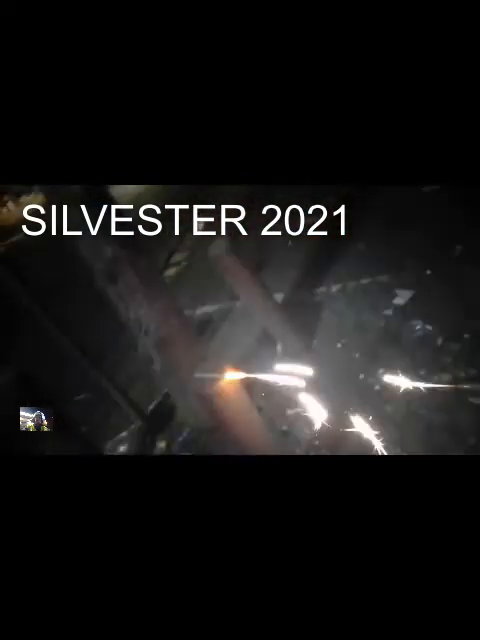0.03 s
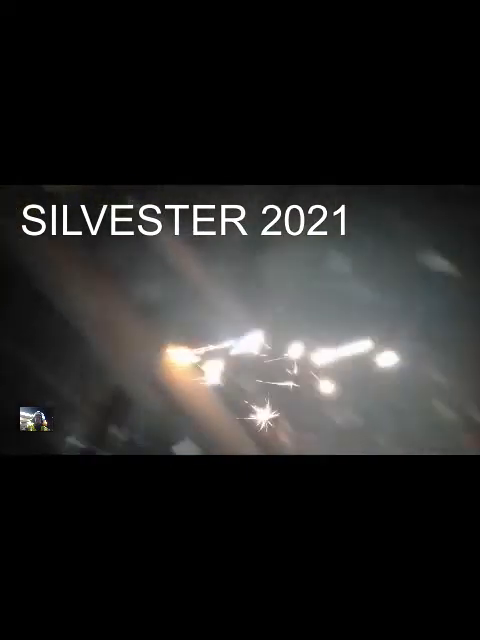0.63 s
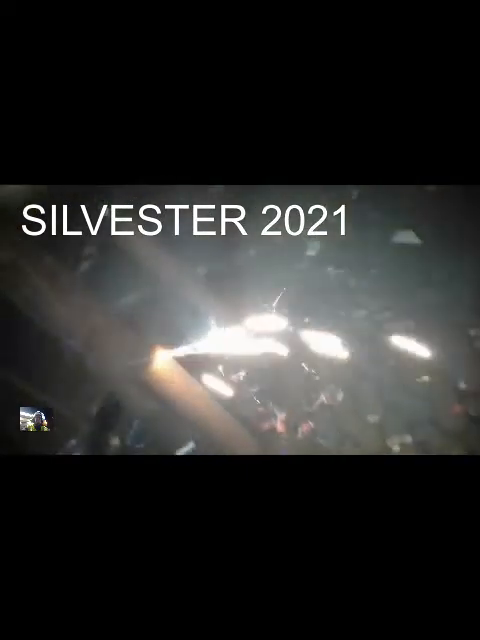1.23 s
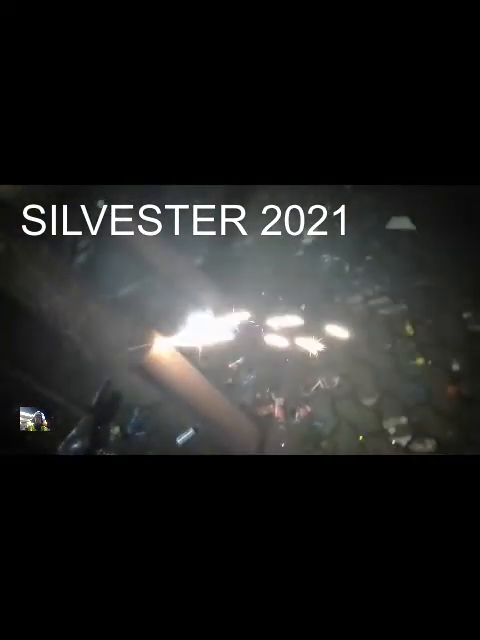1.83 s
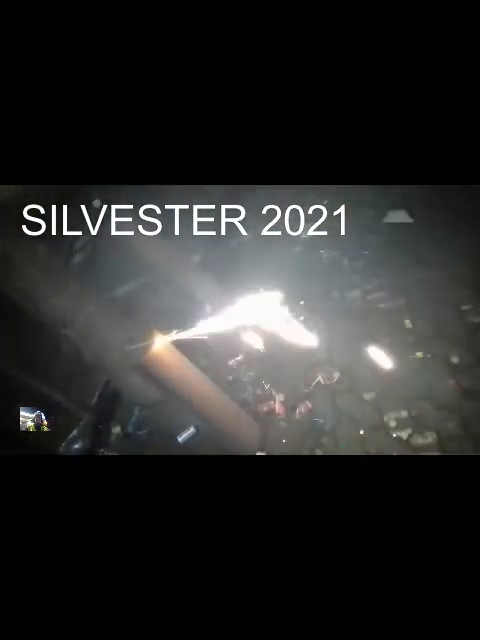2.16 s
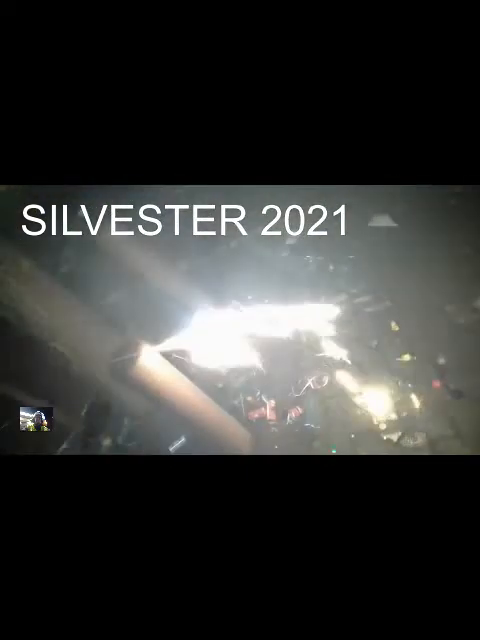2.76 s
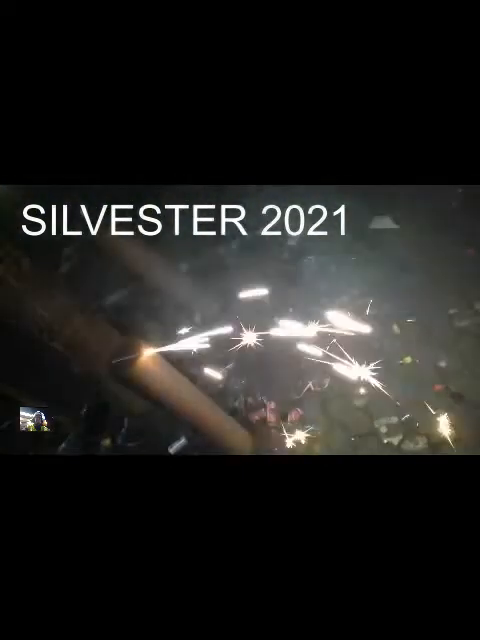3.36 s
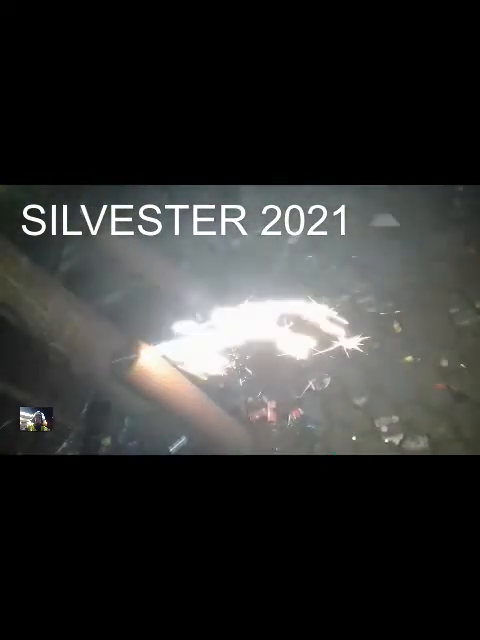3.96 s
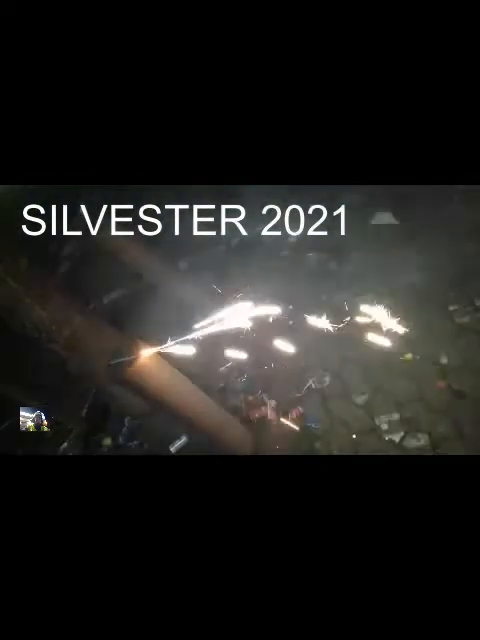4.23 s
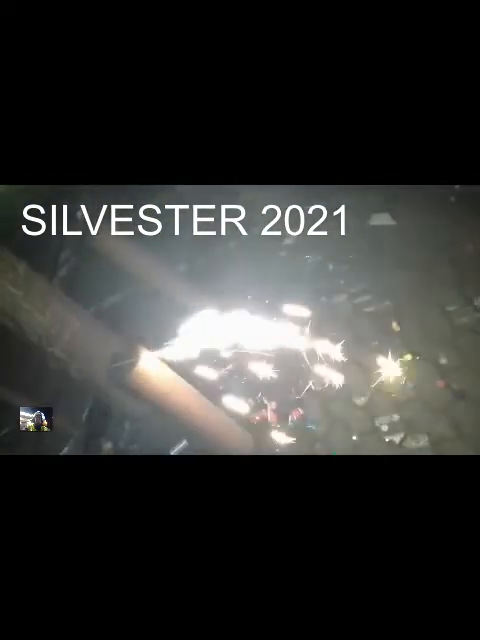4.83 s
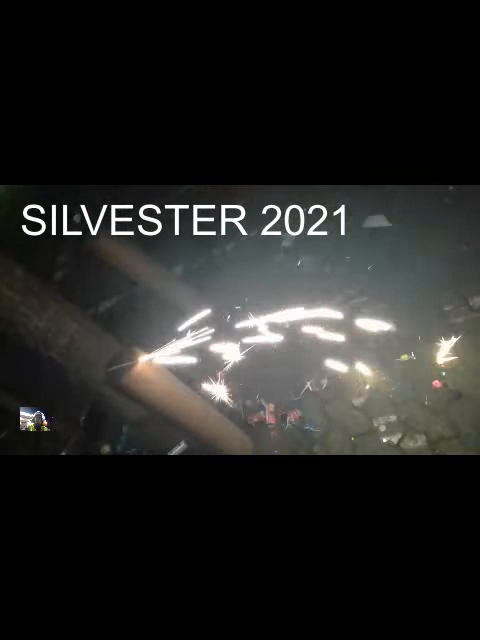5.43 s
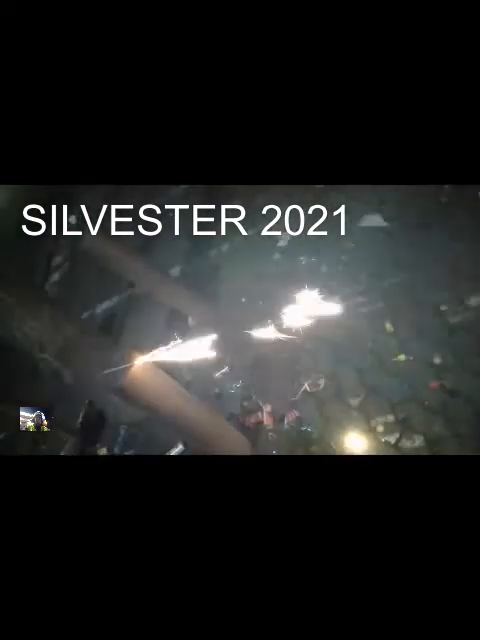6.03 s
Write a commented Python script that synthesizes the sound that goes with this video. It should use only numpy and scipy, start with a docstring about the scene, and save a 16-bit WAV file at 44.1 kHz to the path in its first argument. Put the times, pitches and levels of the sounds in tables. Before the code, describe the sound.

A small firework fountain burns with a high, faintly whistling hiss while sparks tick and snap irregularly. The hiss thins and the crackling eases, then returns in several showers with sharp pops. Near the end the flame gives one short, hollow whoosh, followed by a few last cracks. The microphone is about a metre away in a quiet paved yard with faint wall echoes.

```python
"""A small firework fountain burns on a paved yard at night, about a metre from a phone microphone.
Gas hisses through its nozzle and roars in its fluttering flame. Metal sparks tick and burst in the
air, each echoed by the paving and answered faintly by the house walls. The hiss thins as the nozzle
burns wider, and the charge ends in one hollow whoosh."""
import sys
import numpy as np
from scipy import signal
from scipy.fft import rfft, irfft, next_fast_len
from scipy.io import wavfile
from scipy.ndimage import map_coordinates

SR = 44100
rng = np.random.default_rng(int(sys.argv[2]) if len(sys.argv) > 2 else 0)


def materialize(psi):
    """Save the field psi as 16-bit PCM at rate SR to the path in sys.argv[1].

    A 1-D psi becomes a single channel; in a 2-D psi each row is a channel.
    """
    bounded = np.clip(np.atleast_2d(psi).T, -1, 1)
    quanta = np.round(bounded * 32767).astype(np.int16)
    wavfile.write(sys.argv[1], SR, quanta)


N = 268128
TIME = np.arange(N) / SR

# The slow course of the burn. Each row: time in seconds, then hiss, rush and roar in relative dB.
BURN = [(0.0, -34, -67, -58), (0.45, -36.5, -60, -59.5), (0.54, -33, -68, -54.5), (0.8, -29, -76, -54),
        (1.1, -33, -63, -58.5), (1.29, -37, -62, -59.5), (1.56, -39.5, -62, -45), (1.76, -42, -65.5, -69.5),
        (1.96, -48.5, -63, -64), (2.73, -54, -61, -62), (3.3, -55, -59, -57), (4.15, -54, -60, -54.5),
        (4.55, -60, -59.5, -61.5), (5.28, -69, -58, -58), (5.46, -61, -51, -42), (5.62, -63, -58.5, -47),
        (5.8, -65, -59, -52), (6.08, -54, -62.5, -50.5)]
# The nozzle spits showers of sparks. Each row: peak time and half length in seconds, hiss rise in dB.
SHOWERS = [(2.94, 0.36, 13), (3.93, 0.45, 6.5), (4.93, 0.33, 12.5), (5.42, 0.09, 8)]


def undb(db):
    """Decibels to gain."""
    return 10 ** (np.asarray(db) / 20)


def curves(table):
    """Each column after the first, joined by straight lines in time."""
    times, *columns = np.transpose(table)
    return [np.interp(TIME, times, column) for column in columns]


def swells(table):
    """Bell-shaped swells in dB, summed into one curve for each level column."""
    peak_s, half_length, *columns = np.transpose(table)
    bells = np.exp(-((TIME - peak_s[:, None]) / half_length[:, None]) ** 2)
    return [db @ bells for db in columns]


def gains(spectrum, hz):
    """A spectrum of (Hz, dB) points as gain at the given frequencies."""
    at, db = np.transpose(spectrum)
    return undb(np.interp(np.log(np.maximum(hz, 1)), np.log(at), db))


def coloured(x, spectrum):
    """The sound filtered by a spectrum."""
    size = next_fast_len(N)
    hz = np.arange(size // 2 + 1) * SR / size
    return irfft(rfft(x, size) * gains(spectrum, hz), size)[:N]


def noise(spectrum):
    """Coloured noise of rms 1."""
    x = coloured(rng.standard_normal(next_fast_len(N)), spectrum)
    return x / x.std()


def wander(rate):
    """A random curve with a spread of 1, turning about rate times a second."""
    knots = rng.standard_normal(N // 10)
    curve = np.interp(TIME * rate, np.arange(len(knots)), knots)
    return curve / curve.std()


def tail(x, t60, onset):
    """The sound through a diffuse response of unit energy that builds up and dies away."""
    t = TIME[:SR]
    response = rng.standard_normal(SR) * undb(-60 * t / t60) * (1 - np.exp(-t / onset))
    return signal.fftconvolve(x, response / np.linalg.norm(response))[:N]


def resonances(table):
    """Turbulence in narrow bands; each one swells, glides and fades."""
    out = np.zeros(N)
    for start, end, hz, glide, width, db in table:
        on = (TIME > start) & (TIME < end)
        age = TIME[on] - start
        lowpass = signal.butter(2, width / 2, fs=SR, output="sos")
        slow = signal.sosfilt(lowpass, rng.standard_normal((2, 2 * SR)))[:, :len(age)]
        phase = 2 * np.pi * np.cumsum(hz * (1 + glide * age)) / SR
        band = (slow[0] * np.cos(phase) + slow[1] * np.sin(phase)) / slow.std()
        out[on] += undb(db) * np.sin(np.pi * age / (end - start)) * band
    return out


def nozzle_hiss(grit_db=3.5, whistle_db=2):
    """The nozzle hisses, and whistles breathily as slag builds up and burns off."""
    # Each row: frequency in Hz, level in dB.
    hiss_spectrum = [(6500, -29), (8400, -51), (9600, -12), (11000, -10), (12500, -0.5), (13600, -1),
                     (15000, 1.5), (15650, -10), (16000, -37)]
    # Each row: start and end in seconds, first pitch in Hz, glide as a share of it per second,
    # width in Hz, relative level in dB.
    whistles = [(-0.4, 0.8, 7520, 0.014, 253, -24.5), (-0.4, 0.65, 8840, 0.02, 300, -20),
                (-0.4, 0.8, 10020, 0.0086, 302, -16.5), (-0.4, 0.7, 10800, 0.015, 350, -9),
                (-0.4, 0.7, 12600, 0.018, 446, -8), (-0.3, 0.9, 13420, 0.015, 900, -2.5),
                (0.55, 1.25, 11070, 0.11, 900, -4), (0.6, 1.9, 7500, 0.017, 302, -26),
                (0.7, 1.6, 9380, 0.083, 500, -10), (0.65, 2.0, 12060, 0.015, 650, -0.5),
                (0.75, 1.9, 13400, 0.012, 600, -6), (1.25, 1.95, 8650, 0.049, 300, -13.5),
                (1.2, 1.92, 9690, 0.17, 800, -1.5), (1.1, 1.95, 15100, 0.0056, 453, -10),
                (1.75, 2.65, 10670, 0.1, 1330, -0.5), (4.7, 5.9, 13560, 0.04, 800, 9)]
    grit = undb(grit_db * wander(1800))  # grains of powder pass the nozzle
    return noise(hiss_spectrum) * grit + undb(whistle_db) * resonances(whistles)


def flame_roar():
    """The flame roars, and the hard-blowing tube adds hollow resonances."""
    # Each row: frequency in Hz, level in dB.
    roar_spectrum = [(30, -58), (150, -57), (220, -9), (420, 2), (560, 1.5), (800, -1), (1100, -3),
                     (1400, 2.5), (1900, -2), (2500, 2.5), (3200, -9), (4200, -9), (7000, -22.5)]
    # Each row: start and end in seconds, first pitch in Hz, glide as a share of it per second,
    # width in Hz, level over the roar in dB.
    hollows = [(-0.55, 0.79, 1116, -0.08, 150, -2), (-0.4, 0.79, 1470, 0, 280, -0.5),
               (0.1, 0.46, 2120, 0.028, 151, -7), (-0.1, 0.74, 2420, -0.033, 79, -5),
               (-0.2, 1.1, 2697, 0.016, 90, -6), (1.5, 1.2, 920, 0.1, 290, -7.5),
               (0.36, 1.34, 1280, 0.046, 150, 0.5), (0.67, 1.48, 1720, 0.15, 260, 3),
               (0.6, 1.35, 3000, -0.026, 100, -1.5), (0.7, 1.32, 3300, 0.025, 150, -4.5),
               (0.6, 1.12, 3580, -0.08, 160, -6.5), (0.5, 1.19, 4150, 0.0067, 450, -7),
               (2, 3.5, 4420, 0.016, 200, -11), (3, 3.2, 941, -0.011, 140, -1),
               (5, 6.2, 798, 0.074, 260, -8), (5.5, 5.9, 1450, 0.15, 300, -2),
               (5.5, 5.82, 2420, 0.0054, 260, -2.5), (5.55, 6.24, 4930, 0.034, 280, -10),
               (5.5, 6.1, 5820, -0.055, 250, -8.5)]
    return noise(roar_spectrum) + resonances(hollows)


def off_paving(gas, reflection=.76):
    """The jet reaches the microphone again off the paving, which combs it and makes it hollow."""
    # Each row: time in seconds, lag of the echo in milliseconds.
    echo_lags = [(0, 3.75), (0.35, 3.73), (0.75, 3.655), (1.1, 3.63), (1.7, 3.62), (6.08, 3.62)]
    lag_ms, = curves(echo_lags)
    delayed = map_coordinates(gas, [(TIME - lag_ms / 1000) * SR], order=3)
    echo = signal.sosfiltfilt(signal.butter(1, 14000, fs=SR, output="sos"), delayed)
    return (gas + reflection * echo) / np.hypot(1, reflection)


def through_tube(gas):
    """The tube swallows bands between its resonances; each gap deepens and closes again."""
    # Each row: the gap's two ends in seconds, centre and width in Hz, deepest gain in dB.
    gaps = [(-0.9, 0.42, 1890, 160, -1), (0.5, 0.6, 11200, 300, -7), (0.2, 1.8, 6500, 1100, -6),
            (0.65, 2.04, 2700, 250, -13), (1.05, 2.0, 11200, 320, -11), (4, 5.95, 1030, 120, -12),
            (6, 5.3, 1830, 88, -9), (5.5, 5.74, 3800, 350, -5), (4.5, 6.0, 7900, 1100, -7)]
    hz, t, spectra = signal.stft(gas, SR, nperseg=1024)
    for start, end, centre, width, db in gaps:
        progress = np.clip((t - start) / (end - start), 0, 1)
        depth = np.sqrt(np.abs(np.sin(np.pi * progress)))
        band = np.exp(-((hz - centre) / width) ** 2)
        spectra = spectra * undb(db * np.outer(band, depth))
    return signal.istft(spectra, SR)[1][:N]


def jet(flicker_db=2, sputter_db=1.4, flutter_rest_db=-70.5):
    """Gas hisses, rushes and roars under a fluttering plume; the uneven burn shakes all of it."""
    # The flame flares. Each row: peak time and half length in seconds, roar and flutter change in dB.
    flares = [(0.09, 0.013, 6.5, -3), (0.55, 0.04, 2.5, 13), (0.75, 0.14, 0, 13), (1.328, 0.027, 15, -18),
              (1.554, 0.085, -1, 9), (2.09, 0.025, 10, 2), (3.27, 0.063, 7, 6), (4.79, 0.033, 8.5, 9),
              (4.97, 0.093, 6.5, 5.5), (5.478, 0.034, 4.5, 16), (5.529, 0.015, 7, 27.5),
              (5.588, 0.02, 5, 24.5), (5.672, 0.012, 5, 3), (5.725, 0.053, 6.5, 11)]
    # The bright rush of gas and the plume's low flutter. Each row: frequency in Hz, level in dB.
    rush_spectrum = [(1800, -19), (3200, -2.5), (4400, 0), (5700, 4), (6500, 3.5), (8000, 3.5),
                     (10000, 2.5), (14000, -1.5)]
    flutter_spectrum = [(25, -44), (75, -23.5), (125, -15), (165, -49), (205, -10), (250, 0.5), (320, 6.5),
                        (420, -11.5), (700, -19)]
    hiss_db, rush_db, roar_db = curves(BURN)
    flare_db, flutter_db = swells(flares)
    shower_db, = swells(SHOWERS)
    flame_db = flicker_db * wander(110)
    hiss = nozzle_hiss() * undb(hiss_db + shower_db - 8)
    rush = noise(rush_spectrum) * undb(rush_db + 0.48 * flare_db + 0.19 * shower_db)
    roar = flame_roar() * undb(roar_db + flare_db + flame_db - 4)
    flutter = noise(flutter_spectrum) * undb(flutter_rest_db + flutter_db + flame_db)
    gas = (hiss + rush + roar) * undb(sputter_db * wander(55))
    return through_tube(off_paving(gas)) + flutter  # the whole plume flutters, with no sharp echo


def night_air(level_db=-71.5):
    """The faint, steady air of the yard."""
    # Each row: frequency in Hz, level in dB.
    air_spectrum = [(20, 6), (70, -2), (160, -16), (280, -5), (1000, 7), (4000, 5.5), (15000, -51)]
    return undb(level_db) * noise(air_spectrum)


def sparks(start_s, body_db, body_hz, body_q, crack_db, tilt_db, lag_ms, echo_db,
           splinter_db=-15, splinter_s=0.000795, low_cut_hz=209, tilt_from_hz=6940):
    """Each spark is a short blast and a treble crack; it sheds a splinter and echoes off the paving."""
    def unit_rms(spectra):
        return spectra / np.sqrt(np.mean(np.abs(spectra) ** 2, axis=1, keepdims=True))

    def repeat(db, lag_s):
        return 1 + undb(db) * np.exp(-2j * np.pi * np.outer(lag_s, hz))

    # Each row: frequency in Hz, level in dB.
    crack_spectrum = [(200, -74.5), (3000, -52), (7000, -25.5), (9000, -16), (10500, -11), (12000, -6),
                      (13700, 1.5), (15000, -8), (15700, -1.5), (16500, -19)]
    size, lead = 2048, 128  # samples in a spark, and those ahead of its start
    hz = np.arange(size // 2 + 1) * SR / size + 1
    body, low = 1j * hz / body_hz[:, None], 1j * hz / low_cut_hz
    low_cut = (low ** 2 / (1 + np.sqrt(2) * low + low ** 2)) ** 2
    blast = body / (1 + body / body_q[:, None] + body ** 2) / (1 + body / 4) * low_cut
    octaves = np.log2(np.maximum(hz / tilt_from_hz, 1))
    crack = gains(crack_spectrum, hz) * undb(np.outer(tilt_db, octaves))
    burst = undb(body_db)[:, None] * unit_rms(blast) + undb(crack_db)[:, None] * unit_rms(crack)
    burst *= repeat(splinter_db, splinter_s * (.5 + rng.random(len(start_s))))
    burst *= repeat(echo_db, lag_ms / 1000)
    starts = np.clip(np.round(start_s * SR).astype(int), 0, N)
    out = np.zeros(N + 2 * size)
    for at, wave in zip(starts, np.roll(irfft(burst), lead, axis=1)):
        out[at:at + size] -= wave
    return out[lead:lead + N]


def small_sparks(start_s, crack_db, tilt_db, body_offset_db, scatter_db=12):
    """Small sparks are nearly all treble; their blast and their height above the ground vary."""
    height, strength, pace = rng.random((len(start_s), 3)).T
    body_db = crack_db + body_offset_db + scatter_db * (strength - .5)
    body_hz = 1150 * 2 ** (2 * pace - 1)
    body_q = np.full(len(start_s), 0.44)
    lag_ms = 1.4 + 2.4 * height
    return sparks(start_s, body_db, body_hz, body_q, crack_db, tilt_db, lag_ms, echo_db=-5)


def fizz(count=200, tilt_db=10, warm_up_db=9, warm_up_s=2.5):
    """A spray of tiny sparks, slow to get going, stronger in showers and while the nozzle blows hard."""
    when, size, brightness = rng.random((count, 3)).T
    start_s = when * N / SR
    size_db = -35 + 4 * np.minimum(-np.log(size), 2)
    blow_db = curves(BURN)[0]
    drive_db = 0.31 * (blow_db - blow_db.mean()) + 0.72 * swells(SHOWERS)[0]
    lacking_db = warm_up_db * np.maximum(1 - start_s / warm_up_s, 0)
    crack_db = size_db + np.interp(start_s, TIME, drive_db) - lacking_db
    return small_sparks(start_s, crack_db, tilt_db * (2 * brightness - 1), body_offset_db=-17.5)


def ticks():
    """Small sparks spit one by one and stand out from the spray."""
    # Each row: start in seconds, crack level in dB, brightness in dB per octave.
    spits = [(0.043, -13.5, 9), (0.373, -20, 4), (0.478, -13.5, 0), (0.489, -17, -6), (0.529, -13.5, 12),
             (0.538, -17, 24), (0.595, -17.0, 18), (0.608, -16, 10), (0.627, -18.5, -2), (0.659, -14.0, 6),
             (0.679, -10.5, 4), (0.735, -8, 4), (0.748, -11, 1), (0.77, -11, 1), (0.795, -14, 3),
             (0.828, -13, -1), (0.845, -11, -4), (0.981, -12, -4), (1.015, -11, 1), (1.062, -8.0, 0),
             (1.08, -10.5, 2), (1.095, -22, -4), (1.114, -15, 1), (1.132, -17, 1), (1.18, -17, -4.5),
             (1.205, -13.5, 0.5), (1.234, -16, 2), (1.237, -25, 23), (1.301, -15, -6), (1.309, -10.0, 20),
             (1.334, -12, 12), (1.378, -13, 12), (1.398, -17.0, 23), (1.445, -18.5, 18), (1.689, -16.5, -4),
             (1.713, -19.0, -6), (1.725, -16.0, 0), (1.823, -19, 12), (1.898, -23, 4), (1.946, -20.5, -3),
             (1.966, -23.5, -2), (2.004, -21, -3), (2.032, -21.5, -8), (2.094, -22.5, -12), (2.124, -24, 2),
             (2.174, -19, -9), (2.227, -25, 0), (2.239, -21.5, -6), (2.289, -25, 8), (2.297, -20.5, -7),
             (2.455, -23, 0), (2.463, -25, 4), (2.559, -15.5, 0), (2.567, -23.5, -12), (2.588, -19, -5),
             (2.667, -19.5, -8), (2.684, -24, -7), (2.7, -22.5, 0), (2.741, -22.5, -8), (2.814, -25, -17),
             (2.827, -19, 6), (2.831, -21.5, 8), (2.854, -18, -8), (2.894, -10.5, -5), (2.903, -10, 14),
             (2.916, -12, -4), (2.925, -14, 6), (2.934, -14, 16), (2.945, -15.5, -6), (2.985, -18.0, 16),
             (2.995, -16, 16), (3.011, -22, 0), (3.029, -18.5, 16), (3.057, -22.0, -8), (3.099, -18.5, -10),
             (3.159, -15.5, -5), (3.189, -18.5, -8), (3.194, -21, -6), (3.258, -19, -2), (3.264, -20, -12),
             (3.354, -20, -8), (3.377, -22.0, 6), (3.525, -19, 4), (3.531, -12.5, 4), (3.539, -22, -8),
             (3.557, -20.0, -2), (3.598, -23, -12), (3.604, -15.5, 14), (3.606, -23.5, 18),
             (3.639, -21, -9), (3.706, -16, 0), (3.741, -20, 24), (3.76, -21, 10), (3.773, -22, 4),
             (3.78, -22.5, -12), (3.788, -24, 0), (3.793, -18.5, 2), (3.833, -21, 16), (3.85, -21.5, -6),
             (3.889, -15, -2), (3.931, -19, -6), (3.957, -20, 8), (4.01, -20.5, -6), (4.018, -22.0, 8),
             (4.027, -20, 8), (4.046, -14, 16), (4.072, -22.5, -3), (4.08, -19, 4), (4.083, -24, -3),
             (4.111, -20.5, -10), (4.152, -22, 6), (4.178, -25, -12), (4.192, -17.5, -4), (4.197, -24, -6),
             (4.266, -18.5, 13), (4.275, -21.5, -4), (4.39, -20, -6), (4.423, -21, 16), (4.442, -23.5, -6),
             (4.567, -17.0, 10), (4.58, -21, -6), (4.647, -19, 12), (4.657, -23.0, -2), (4.669, -20, 6),
             (4.69, -21.5, 0), (4.696, -19, 14), (4.704, -16, 3), (4.753, -17, 6), (4.76, -19, 10),
             (4.79, -14, -5), (4.805, -16.0, 6), (4.846, -18, 12), (4.859, -15, 2), (4.871, -23.0, 16),
             (4.879, -21, 20), (4.887, -15.5, 7), (4.9, -18, 18), (4.929, -15.5, 7), (4.93, -16, 4),
             (4.946, -20.0, -3), (4.99, -14, -2), (5.005, -13.0, 16), (5.03, -13.5, 0), (5.043, -15.5, 16),
             (5.065, -12, 20), (5.073, -12, 18), (5.106, -18, 12), (5.142, -22, 10), (5.183, -17, 4),
             (5.208, -21.5, 0), (5.22, -18, 0), (5.249, -20.5, -10), (5.289, -21, 2), (5.317, -22, 20),
             (5.331, -24, -2), (5.362, -20, 0), (5.39, -11, -1), (5.404, -19, -17), (5.431, -15, -6),
             (5.455, -14, 10), (5.467, -12, 12), (5.476, -14, 7), (5.496, -14, 8), (5.51, -20, 14),
             (5.632, -19, -10), (5.802, -19.5, -6), (5.812, -23.0, -8), (5.957, -23, -8),
             (5.972, -16.5, -1), (6.007, -24, 2), (6.048, -20, 14)]
    return small_sparks(*np.transpose(spits), body_offset_db=-24)


def pops():
    """Big sparks burst; a slow, resonant blast knocks like wood, a quick one snaps."""
    # Each row: start in seconds, the body's level in dB, centre in Hz and Q, the crack's level in dB
    # and brightness in dB per octave, lag of the paving echo in milliseconds.
    bursts = [(0.2928, -46, 400, 0.31, -26, -7, 4.1), (0.6354, -19, 850, 0.19, -1.5, 8, 3.2),
              (0.7561, -25.0, 960, 1.6, -7, 1, 2.29), (0.8503, -28.5, 1260, 1.56, -26.0, -1, 3.4),
              (0.9481, -29, 670, 0.56, -10, 0, 3.7), (1.431, -18.5, 1070, 0.24, -2.0, 5, 3.64),
              (1.4904, -17.5, 1030, 0.65, -4, -4, 1.5), (1.5267, -17.5, 1180, 0.67, -6, 4, 2.6),
              (1.5818, -16.5, 960, 0.64, -0.5, -0.5, 2.3), (1.7871, -39, 410, 0.39, -18, 4, 3.2),
              (1.809, -36.5, 740, 1.5, -19, -5, 2.56), (1.8456, -40.0, 1220, 0.91, -23, -3, 4.3),
              (1.915, -42, 400, 0.69, -22, 0, 3.07), (2.1, -32.5, 550, 1.6, -25, -12, 4),
              (2.195, -39.5, 630, 0.25, -16, -8, 3), (2.3526, -32.5, 856, 0.71, -20, -13, 1.18),
              (2.3769, -34, 580, 1.2, -16.5, 0, 3.4), (2.7299, -33.5, 400, 0.28, -18, -3, 2.5),
              (2.796, -23.5, 1060, 0.17, -15.5, -3, 2.8), (2.87, -13, 2900, 0.21, -4, -1, 2.35),
              (2.9982, -31.5, 620, 1.6, -12.5, -2, 3.31), (3.0482, -35, 630, 0.68, -25.5, -10, 3.5),
              (3.0754, -30, 1310, 0.22, -16, -5, 3.1), (3.1112, -29, 830, 0.91, -18, 3, 2.4),
              (3.249, -18.5, 1370, 0.12, -9.0, -3, 2.8), (3.4137, -15.0, 2400, 0.27, -6.5, 2, 2.3),
              (3.479, -16, 1870, 0.12, -8.0, 7, 3.2), (3.5116, -35, 760, 1.04, -28, 3, 1.57),
              (3.6803, -17.0, 2260, 0.33, -8.5, 3, 1.9), (3.8788, -20.5, 2420, 0.31, -11.5, 10, 2.6),
              (3.9405, -29.5, 1630, 0.74, -16, 0, 3.31), (4.1473, -30, 1180, 1.6, -22, 8, 3.61),
              (4.2804, -33.5, 710, 1.06, -19.0, -4, 1.4), (4.3733, -33, 570, 0.23, -15, -4, 0.93),
              (4.4743, -33.5, 630, 0.87, -20, -2, 1.5), (4.5307, -32, 1060, 0.4, -22, 4, 1.57),
              (4.6333, -35.5, 1220, 1.5, -32, 16, 2.27), (4.769, -15.5, 1600, 0.12, -11, 5, 3.6),
              (4.777, -13.5, 1420, 0.2, -8.5, -3, 1.9), (4.7787, -17, 1430, 0.26, -5.5, -6, 2.94),
              (4.9578, -14.0, 2700, 0.53, -2.5, 9, 2.2), (4.9749, -22.5, 940, 0.87, -8, -3, 1.34),
              (5.0827, -14.5, 2390, 0.22, -1.5, 9, 2.65), (5.15, -31.5, 740, 0.52, -19, -9, 1.2),
              (5.187, -30.5, 905, 1.6, -19.0, -15, 1.23), (5.268, -27.5, 510, 0.23, -17.0, -13, 3.3),
              (5.3743, -16.5, 2060, 0.2, -10, 6, 3.34), (5.4366, -15, 1530, 0.37, -8, -1, 1.37),
              (5.5224, -20, 446, 0.25, -10, 6, 3.3), (5.5354, -21, 540, 0.2, -10.5, 5, 2),
              (5.5832, -19.0, 400, 0.38, -30.0, 16, 3.9), (5.6, -21, 660, 2.4, -16, 1, 1.5),
              (5.769, -20.5, 960, 0.2, -14.5, -5, 2.9), (5.862, -13.0, 1940, 0.76, -10.5, 5, 2.23)]
    return sparks(*np.transpose(bursts), echo_db=-5.5)


def sizzle(crackle, level_db=-10):
    """Each spark sizzles out in the top treble just after it has burst."""
    # Each row: frequency in Hz, gain in dB.
    sizzle_band = [(9000, -45), (12500, -5), (13800, 1), (15200, -15)]
    return undb(level_db) * tail(coloured(crackle, sizzle_band), t60=0.049, onset=.001)


def yard_reflections(crackle):
    """Things nearby and the house walls scatter the sparks; rough surfaces return less of the treble."""
    dull = signal.sosfilt(signal.butter(2, 6000, fs=SR, output="sos"), crackle + 1e-18)
    near = tail(undb(-7) * dull + undb(-13) * crackle, t60=.028, onset=.003)
    walls = tail(undb(-14) * dull + undb(-33) * crackle, t60=0.29, onset=0.049)
    return near + walls


def scene():
    """The fountain and its sparks from a metre away, with the yard around them, in mono."""
    crackle = pops() + ticks() + fizz()
    yard = yard_reflections(crackle)
    return (jet() + crackle + sizzle(crackle) + yard + night_air())[None]


def record(dry, top_hz=15900):
    """The phone cuts the highest treble."""
    return signal.fftconvolve(dry, signal.firwin(301, top_hz, fs=SR)[None], mode="same")


dry = scene()
out = record(dry)
materialize(out)
```